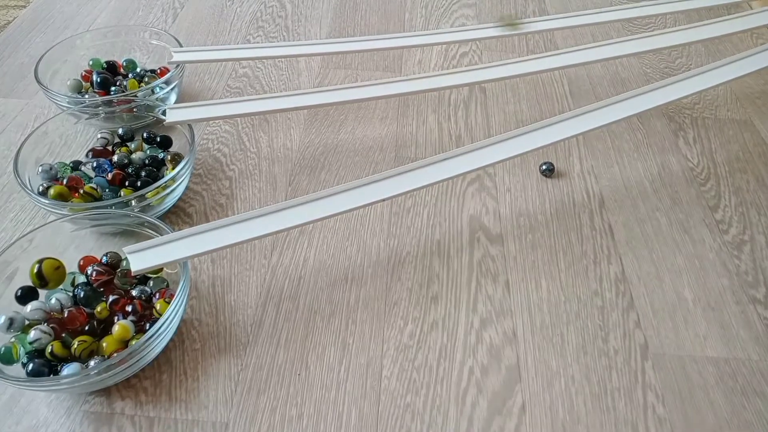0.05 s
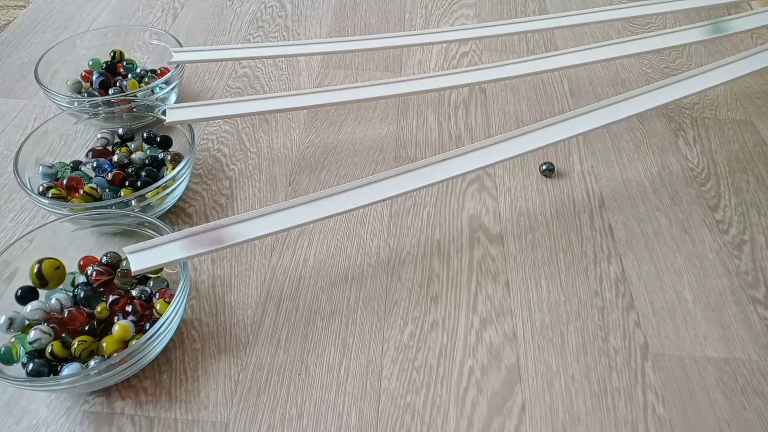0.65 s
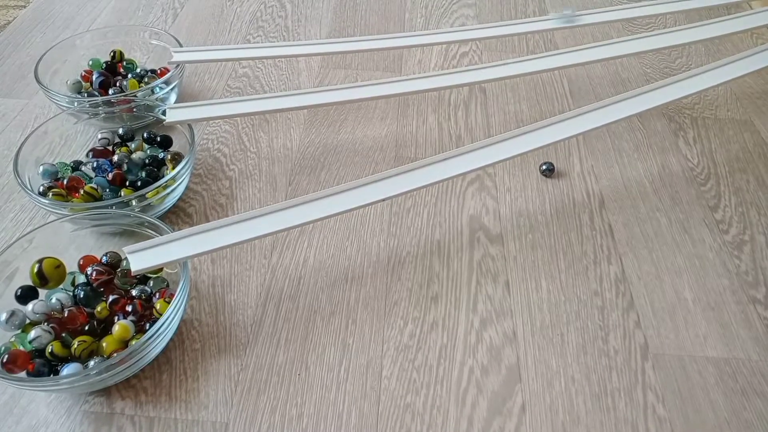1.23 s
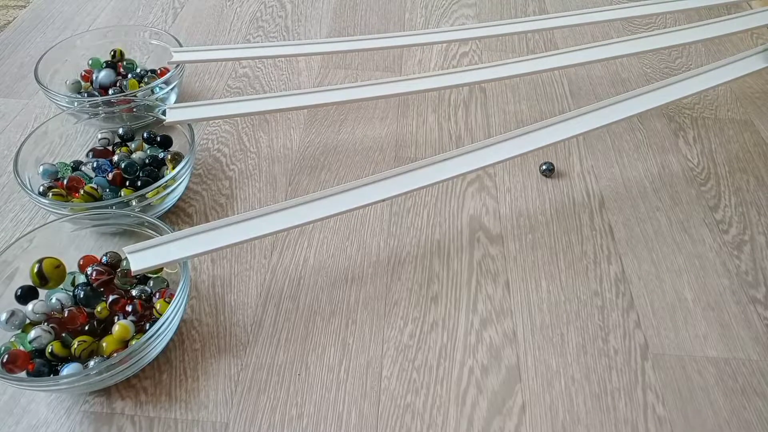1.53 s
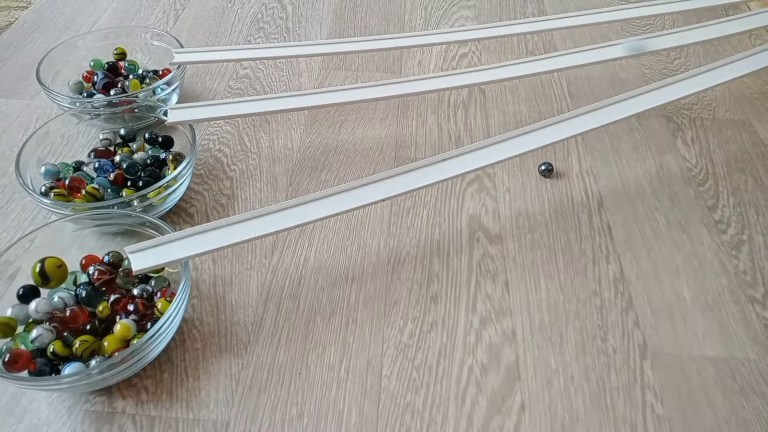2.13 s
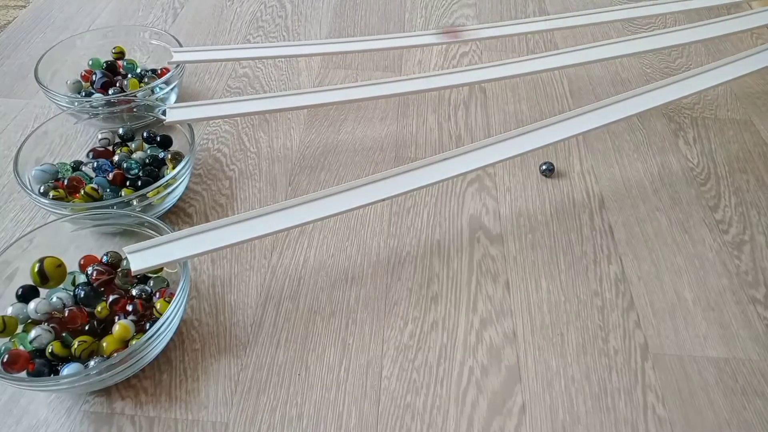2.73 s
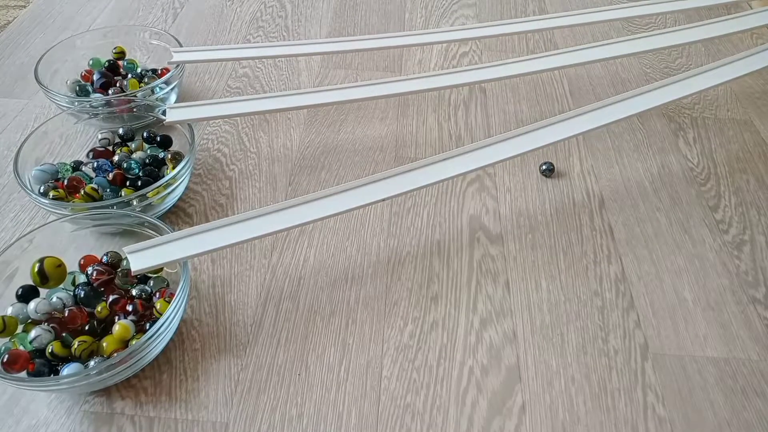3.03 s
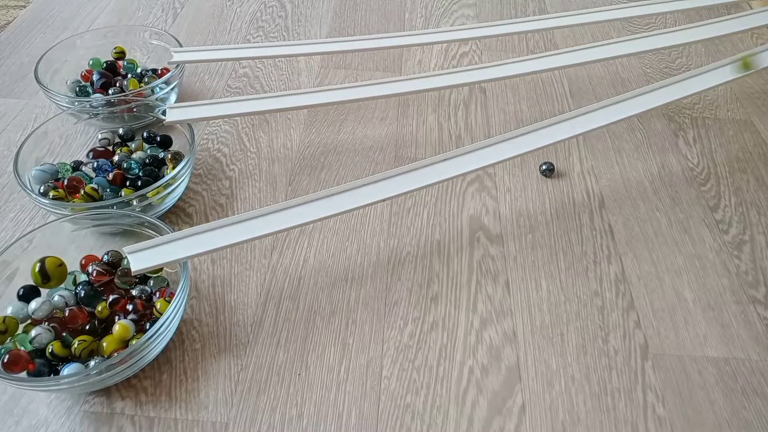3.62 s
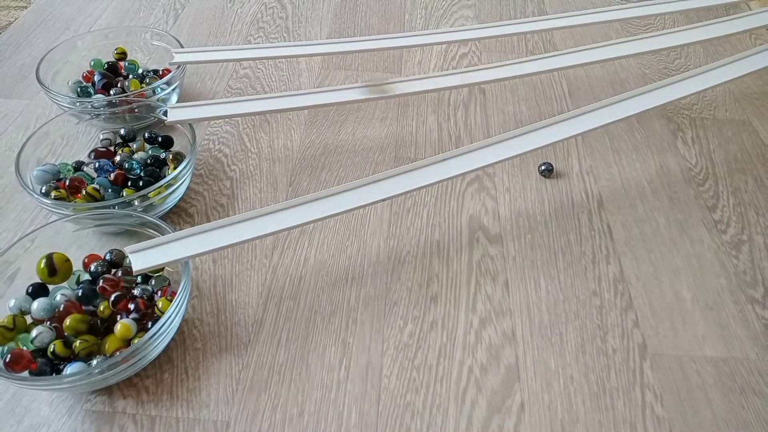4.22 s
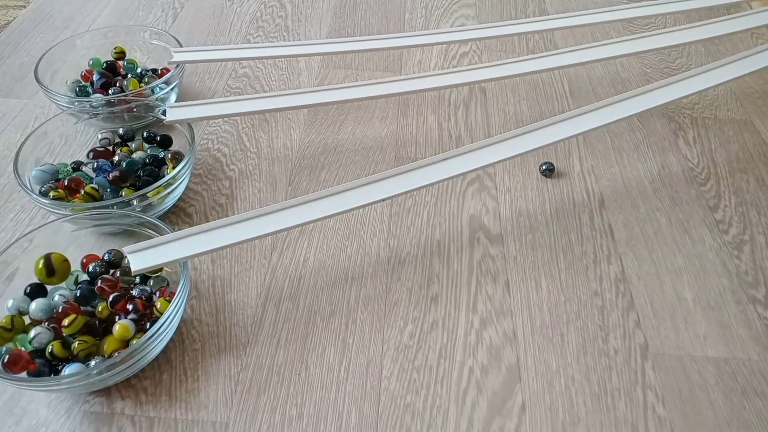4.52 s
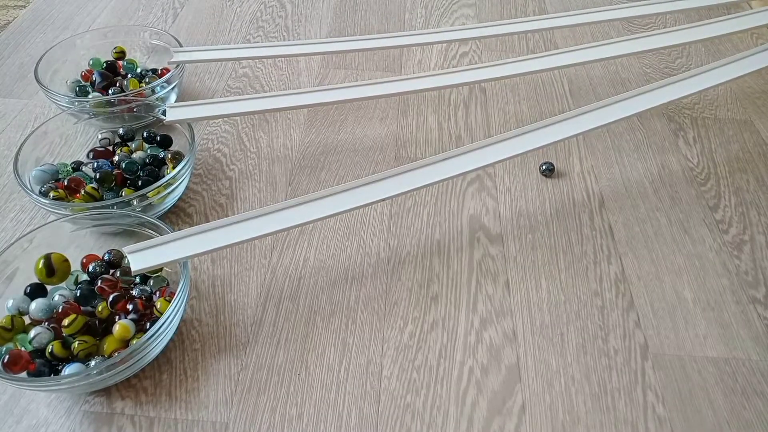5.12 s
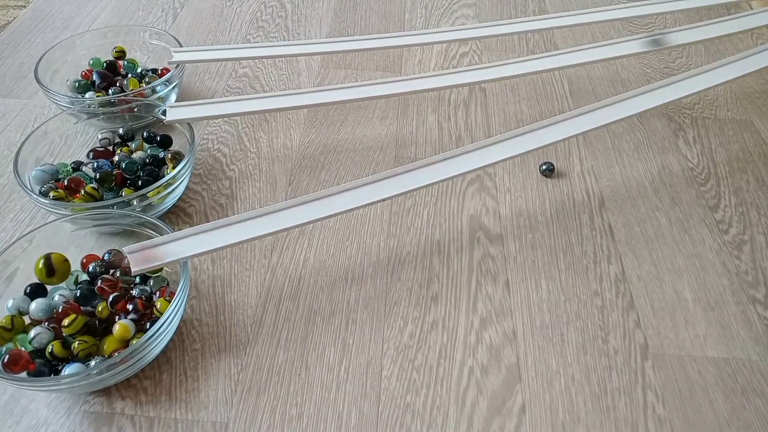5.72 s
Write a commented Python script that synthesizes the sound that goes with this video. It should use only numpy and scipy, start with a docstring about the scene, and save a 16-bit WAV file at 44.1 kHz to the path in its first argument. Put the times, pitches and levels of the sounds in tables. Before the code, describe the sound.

Glass marbles roll down plastic channels and drop one after another into glass bowls of marbles, with sharp clinks and brief ringing.

```python
"""Marbles dropping into glass bowls.

Glass marbles rumble and whine down three plastic channels into bowls already heaped with marbles.
Each impact is a brief click that spreads through the heap as a rattle and excites the damped modes
of the bowl wall. The bowls thud on a wooden floor in a small, hard room; one microphone is close."""
import sys
import numpy as np
from scipy import signal
from scipy.fft import rfft, irfft, next_fast_len
from scipy.io import wavfile
from scipy.ndimage import map_coordinates

SR = 44100
rng = np.random.default_rng(int(sys.argv[2]) if len(sys.argv) > 2 else 0)


def transcribe(u):
    """Save the signal u as a 16-bit wav file named by the first command-line argument.

    u: samples, shape (n,) or (channels, n), limited to [-1, 1]; the rate is SR.
    q: integer samples, one column per channel.
    """
    v = np.clip(np.atleast_2d(u).T, -1, 1)
    q = np.round(v * 32767).astype(np.int16)
    wavfile.write(sys.argv[1], SR, q)


N = 262836
LENGTH = 16384  # samples in one impact
TIME, AGE = np.arange(N) / SR, np.arange(LENGTH) / SR
HZ = np.fft.rfftfreq(LENGTH, 1 / SR)

# reverberation of the room: (frequency [Hz], t60 [s])
ROOM_T60 = [(100, .25), (500, .36), (1400, .31), (3700, .235), (9700, .235), (15000, .23)]
# spectrum of the room noise: (frequency [Hz], level [dB])
AMBIENT_SPECTRUM = [(15, -58.5), (25, -18.5), (92, -7.5), (145, -2.5), (503, -14.5), (1020, -27.5),
                    (1160, -29), (4370, -22.5), (4870, -24.5), (5430, -24), (16000, -51.5)]
# spectrum of glass rolling on plastic: (frequency [Hz], level [dB])
ROLLING_SPECTRUM = [(40, -21), (120, -9), (450, -4), (700, -3), (1150, -2), (2600, -1), (3900, -5),
                    (4600, -18), (5500, -14), (7000, -18), (8200, -16), (9400, -10), (11000, -20),
                    (16000, -40)]
# response of the floorboard: (frequency [Hz], level [dB])
FLOOR_SPECTRUM = [(25, -19.5), (70, -1), (135, 5.5), (200, -2.5), (350, -15), (900, -32.5), (3000, -82.5)]
# spectrum of one glass contact: (frequency [Hz], level [dB])
CLICK_SPECTRUM = [(60, -27), (200, -19.5), (420, -3.5), (740, -10), (950, -8), (1500, -9), (2300, 4.5),
                  (3300, 1), (5300, -10), (6900, -9), (7900, -7.5), (9300, -2.5), (11500, -12.5),
                  (15500, -14)]
# spectrum of collisions within the heap: (frequency [Hz], level [dB])
HEAP_SPECTRUM = [(60, -22), (200, -21.5), (420, -14.5), (740, -8), (950, -7.5), (1100, 1), (1600, -4.5),
                 (2300, 5), (3300, 4), (5400, -7.5), (6900, -1.5), (7900, -8), (9500, -2), (11500, -20),
                 (15500, -12.5)]
# resonances of a plastic channel: (frequency [Hz], bandwidth [Hz], level [dB])
CHANNEL_MODES = [(410, 240, -25.5), (905, 28, -13.5), (1210, 47, -8), (2130, 203, -3), (2890, 2340, -19),
                 (4070, 160, -16)]
# wall modes damped by the heap, in the order lowest, main, upper ones:
# (frequency [Hz], level among the upper modes [dB], t60 [s])
BOWL_MODES = [(2238, 0, .1), (3966, 0, .13), (6064, -1, .1), (8505, 0, .105), (11240, -6, .08)]
# the bowl's highest modes: (frequency [Hz], bandwidth [Hz], level [dB])
SHIMMER_MODES = [(10170, 50, -9), (11900, 60, -2), (12060, 55, 0), (12862, 35, -1), (12998, 35, -1),
                 (13600, 35, -6), (13820, 50, -3), (14295, 45, -2), (14830, 55, -2), (15205, 45, 1)]
# each channel with its bowl, by name: (main mode [Hz], thud hardness [dB/octave], two whines),
# each whine at landing being (frequency [Hz], level over the rumble [dB])
LANES = {"near": (3998, 0.33, [(5020, -7), (10000, -17)]), "middle": (3972, 11.7, [(5650, -18),
         (9600, -17.5)]), "far": (3954, 9.5, [(5650, -21.5), (9700, -15.5)])}
# dull knocks on the channels: (time [s], level [dB], tilt [dB/octave])
KNOCKS = [(1.885, -30, -1.5), (3.729, -29.5, 4.5), (4.7361, -27.5, 0.5), (5.519, -42.5, -15)]
# light taps on the near channel: (time [s], level [dB])
PINGS = [(3.347, -36.5), (3.4026, -43.5), (5.099, -38), (5.1126, -23)]
# a marble lands on the heap:
# (time [s], lane, rolling [dB], click [dB], rattle [dB], shimmer [dB], ring [dB], thud [dB])
LANDINGS = [(.0078, "far", -32.5, -10, -31, -30, -36.5, -51.5),
            (.419, "far", -56.5, -22, -23, -28.5, -45, -50), (.822, "near", -54, -15.5, -26, -27, -39, -46),
            (1.183, "middle", -56.5, -12.5, -40, -29.5, -30, -42),
            (1.6362, "far", -57.5, -6.5, -26.5, -29.5, -53, -56),
            (2.0908, "near", -51.5, -12.5, -25, -26, -31, -41.5),
            (2.6017, "middle", -53.5, -10, -35, -45, -43, -71),
            (3.0769, "far", -53.5, -9, -29, -30.5, -49.5, -52),
            (4.1567, "near", -53.5, -10, -31.5, -28, -28.5, -47.5),
            (4.529, "middle", -50.5, -8.5, -30, -27.5, -32.5, -36),
            (5.127, "far", -55, -17, -24, -30, -41.5, -66),
            (5.2707, "far", -56.5, -10.5, -22.5, -33, -35, -70),
            (5.8899, "near", -49.5, -9.5, -40, -31, -38, -60)]
# a marble rebounds against the wall; lean is added to the main mode and taken from the lowest:
# (time [s], ring [dB], lean [dB], click [dB], rattle [dB], thud [dB])
REBOUNDS = [(.026, -27.5, 7, -28, -42, -66), (0.098, -40.5, -1.5, -45, -50, -69),
            (0.1367, -36, 3.5, -21, -52, -75), (0.2006, -39.5, 4, -20, -64.5, -71.5),
            (0.4881, -24, 0, -23, -20.5, -44), (0.8728, -25.5, 2.5, -11, -41, -47.5),
            (.982, -38, 4, -18.5, -46, -72), (1.6797, -26.5, 2.5, -10, -37, -35.5),
            (2.14, -29, 3.5, -13.5, -32, -55), (2.228, -37, 2.5, -13.5, -30, -71),
            (2.63, -27, 8, -10.5, -36, -48), (2.683, -32.5, 3, -37, -58, -75),
            (2.753, -37, 3, -24, -42, -72), (3.146, -30, 4, -14.5, -24.5, -51),
            (4.19, -32.5, 0.5, -12, -25.5, -55), (5.1812, -24.5, 4.5, -14.5, -45, -44.5),
            (5.2977, -28, 1, -38, -31, -51), (5.322, -35, 11.5, -19, -28, -72),
            (5.389, -33.5, 3, -20, -28.5, -68), (5.9128, -27, 2.5, -20, -49, -45.5)]
# lighter clicks in the settling heap or on a channel joint:
# (time [s], click [dB], tilt [dB/octave], rattle [dB])
SETTLES = [(0.082, -24, -7, -30), (0.1299, -18.5, -2, -43), (.436, -19.5, 7.5, -19),
           (.543, -19, 6.5, -25.5), (0.8393, -11.5, -1.5, -38), (1.01, -31, 0, -59), (1.192, -16, 0, -34),
           (1.2576, -16, -1, -31), (1.3047, -13, -2.5, -34), (1.3534, -28, -2, -35), (1.745, -25, 3, -27),
           (1.8932, -20, 0, -41), (1.9228, -27.5, 1.5, -62), (2.5347, -43, -9, -39),
           (2.6899, -15, 1.5, -47), (3.091, -25, 2.5, -22), (3.297, -41, -5, -65.5),
           (3.3471, -31, 1, -53.5), (3.361, -38.5, -14, -46), (4.3159, -24.5, 3, -58),
           (4.3618, -22, -0.5, -37.5), (4.3798, -27.5, 11, -62), (4.426, -25.5, 1, -46),
           (4.629, -16.5, 1, -29.5), (4.6917, -20, 2.5, -57), (4.8542, -36, -2, -51),
           (4.9152, -33, -3.5, -49), (5.4977, -29.5, 1, -47)]

CREEP_S, RUN_S = 0.45, 0.49  # a marble creeps along the top of its channel, then runs down


def amp(db):
    """Decibels to amplitude ratio."""
    return 10 ** (np.asarray(db) / 20)


def unit(x):
    """Normalise to rms 1."""
    return x / np.sqrt(np.mean(x ** 2) + 1e-20)


def burst(x, span_s):
    """Normalise a transient to the energy of rms 1 held for span_s."""
    return x * np.sqrt(span_s * SR / (np.sum(x ** 2) + 1e-20))


def along(points, hz):
    """Interpolate (frequency [Hz], value) points on a logarithmic axis."""
    f, v = np.transpose(points)
    return np.interp(np.log(hz + 1), np.log(f + 1), v)


def add(track, s, x):
    """Superpose x on the track at s seconds."""
    start = max(0, round(s * SR))
    part = track[start:start + len(x)]
    part += x[:len(part)]


def decay(t60):
    """Exponential damping: 60 dB in t60 seconds."""
    return amp(-60 * AGE / t60)


def struck(x, db):
    """Minimum-phase filtering: the causal response to x, given the gain at each frequency."""
    cepstrum = irfft(np.log(np.maximum(amp(db), 1e-6)))
    cepstrum[1:LENGTH // 2] *= 2
    cepstrum[LENGTH // 2 + 1:] = 0
    return irfft(rfft(x) * np.exp(rfft(cepstrum)))


def noise(spectrum):
    """Stationary noise of rms 1, shaped by (frequency [Hz], level [dB]) points."""
    size = next_fast_len(N + LENGTH)
    gain = amp(along(spectrum, np.fft.rfftfreq(size, 1 / SR)))
    return unit(irfft(rfft(rng.standard_normal(size)) * gain, size)[:N])


def wobble(rate_hz):
    """Smooth random modulation through rate_hz knots a second."""
    return map_coordinates(rng.standard_normal(int(N * rate_hz / SR) + 4), [TIME * rate_hz])


def slope(tilt):
    """Spectral tilt as a gain in dB: a harder contact carries more treble."""
    return tilt * np.log2(np.clip(HZ, 1500, 12000) / 4000)


def ripple(depth_db, spacing_hz):
    """Local resonance: each spot in the heap has its own spectral peaks and dips, in dB."""
    return depth_db * map_coordinates(rng.standard_normal(512), [HZ / spacing_hz], mode="wrap")


def resonances(modes):
    """Modal summation: the response of second-order resonators of alternating sign."""
    return sum((-1) ** k * amp(db) * 1j * HZ * width / (hz * hz - HZ ** 2 + 1j * HZ * width)
               for k, (hz, width, db) in enumerate(modes))


def mode(hz, t60):
    """A damped oscillation that flutters in strength and phase, as under shifting marbles."""
    knots = .55 * (rng.standard_normal(64) + 1j * rng.standard_normal(64))
    flutter = np.interp(AGE, np.linspace(0, AGE[-1], len(knots)), knots)
    wave = np.real((1 + flutter) * np.exp(2j * np.pi * (hz * AGE + rng.random())))
    return wave * decay(t60) * (1 - np.exp(-AGE / 0.00067))


def collisions(per_s, lowest, t60):
    """A Poisson train of impulses, drawn between lowest and 1 and dying away."""
    return (rng.random(LENGTH) < per_s / SR) * rng.uniform(lowest, 1, LENGTH) * decay(t60)


def room_tail(build_s=0.00093):
    """Diffuse reverberation: decaying noise, different for each source position."""
    hz, t, bands = signal.stft(rng.standard_normal(LENGTH), SR, nperseg=256)
    absorption = amp(-60 * t / along(ROOM_T60, hz)[:, None])
    tail = signal.istft(bands * absorption, SR, nperseg=256)[1][:LENGTH]
    tail *= 1 - np.exp(-AGE / build_s)
    return tail / np.linalg.norm(tail)


def in_room(x, tail, wet_db):
    """Direct sound plus its convolution with the room's tail."""
    return x + amp(wet_db) * irfft(rfft(x) * rfft(tail))


def background():
    """Ambient noise: a faint steady floor, with a low drone that swells once."""
    swell = np.interp(TIME, [2.6, 2.85, 3.35, 3.65], [0, 1, 1, 0])
    drone = amp(-67.0) * swell * np.sin(2 * np.pi * 86 * TIME + 0.47 * wobble(9))
    return amp(-71.5) * noise(AMBIENT_SPECTRUM) + drone


def rolling(creep_db=-9, pickup_s=0.018, rise_db_per_s=10.5, octaves_per_s=0.22, sink_db_per_s=12):
    """Roughness excitation: as a marble gains speed its rumble grows and its rising whines sink in."""
    power, whines, near_power = np.zeros((3, N))
    # uneven contact smears each whine into a narrow band of noise
    grain = noise([(10, 0), (250, 0), (550, -9), (1500, -30), (4000, -70)])
    hollow = noise([(100, -30), (280, -3), (480, 0), (750, -6), (1500, -20), (4000, -60)])
    for s, lane, db, *_ in LANDINGS:
        span = (TIME > s - RUN_S - CREEP_S) & (TIME < s)
        to_go = s - TIME[span]
        creep = amp(creep_db) * np.sqrt(np.clip((RUN_S + CREEP_S - to_go) / CREEP_S, 0, 1))
        run = .5 + .5 * np.tanh((RUN_S - to_go) / pickup_s)
        level = amp(db - rise_db_per_s * to_go) * np.maximum(creep, run)
        for whine_hz, whine_db in LANES[lane][2]:
            phase = 2 * np.pi * np.cumsum(whine_hz * 2 ** (-octaves_per_s * to_go)) / SR
            whines[span] += amp(whine_db + sink_db_per_s * to_go) * level * np.sin(phase)
        power[span] += level ** 2
        near_power[span] += level ** 2 * (lane == "near")
    uneven_db = .8 * wobble(14) + 1.1 * wobble(110)
    rumble = amp(uneven_db) * np.sqrt(power) * noise(ROLLING_SPECTRUM)
    hum = amp(-16.5 + 2.5 * wobble(25)) * np.sqrt(near_power) * hollow
    return rumble + whines * grain + hum


def channel_knocks(flight_s=0.0093, loss_db=7):
    """Inelastic bouncing: three ever weaker blows excite the plastic's modes; a light tap only pings."""
    track = np.zeros(N)
    body_db = 20 * np.log10(abs(resonances(CHANNEL_MODES)) + 1e-5)
    for s, db, tilt in KNOCKS:
        for hop in range(3):
            bump = rng.standard_normal(LENGTH) * decay(0.19)
            knock = amp(db - hop * loss_db) * burst(struck(bump, body_db + slope(tilt)), 0.012)
            add(track, s + hop * flight_s, in_room(knock, room_tail(), wet_db=-17))
    for s, db in PINGS:
        ping = amp(db) * burst(mode(hz=4900, t60=0.017), 0.0011)
        add(track, s, in_room(ping, room_tail(), wet_db=-9))
    return track


def floor_thuds(knock_transfer_db=-27.5, knock_hardness=16):
    """Structure-borne sound: blows on bowl or channel give the floorboard one short push each."""
    track = np.zeros(N)
    pushes = [(s, db, lane_at(s)[1]) for s, *_, db in LANDINGS + REBOUNDS]
    pushes += [(s, db + knock_transfer_db, knock_hardness) for s, db, _ in KNOCKS]
    for s, db, hardness in pushes:
        board_db = along(FLOOR_SPECTRUM, HZ) + hardness * np.log2(np.clip(HZ, 100, 800) / 100)
        thud = amp(db) * burst(struck(np.exp(-AGE / 0.00024), board_db), 0.017)
        add(track, s, in_room(thud, room_tail(), wet_db=-19.5))
    return track


def lane_at(s):
    """The lane of the marble that landed last."""
    return LANES[[lane for start, lane, *_ in LANDINGS if start <= s][-1]]


def bowl_rings(landing_lean_db=-0.5):
    """Modal vibration: the spot and hardness of a blow set the balance of the wall's modes."""
    track = np.zeros(N)
    mode_hz = np.array(BOWL_MODES)[:, 0]
    hits = [(s, ring, landing_lean_db) for s, *_, ring, _ in LANDINGS] + [row[:3] for row in REBOUNDS]
    for s, db, lean in hits:
        low_db, main_db = db - lean - .8, db + lean - .4
        # the bowls differ most in their low modes
        tuning = 1 + (lane_at(s)[0] / mode_hz[1] - 1) * np.sqrt(mode_hz[1] / mode_hz)
        tail = room_tail()
        low, main, *partials = [amp(level) * unit(in_room(mode(hz * ratio, t60), tail, wet_db=-2))
                                for (hz, level, t60), ratio in zip(BOWL_MODES, tuning)]
        upper = sum(amp(rng.normal(0, 2)) * partial for partial in partials)
        ring = amp(low_db) * burst(low, 0.094) + amp(main_db) * burst(main, 0.06)
        ring += amp(db) * burst(upper, 0.11)
        # the whole rim flexes, a low note that the heap nearly chokes
        flex = amp(low_db - 13) * burst(in_room(mode(hz=935.6, t60=0.073), tail, wet_db=-5), 0.036)
        # the shaking wall makes the marbles that touch it chatter
        taps = struck(collisions(per_s=1800, lowest=-0.78, t60=0.27), along(HEAP_SPECTRUM, HZ))
        chatter = amp(db - 7.5) * burst(in_room(taps, tail, wet_db=-3), 0.023)
        add(track, s, ring + flex + chatter)
    return track


def contacts(landing_tilt=-1.2, rebound_tilt=2, tick_tilt=1.5):
    """Every glass impact: (time [s], click [dB], tilt [dB/octave], rattle [dB], shimmer [dB])."""
    # landings share one tilt, as all marbles fall from one height
    rows = [(s, click, landing_tilt, heap, shimmer) for s, _, _, click, heap, shimmer, _, _ in LANDINGS]
    rows += [(s, click, rebound_tilt, heap, ring - 6.5) for s, ring, _, click, heap, _ in REBOUNDS]
    rows += [(s, click, tilt, heap, heap + 8 + 0.97 * click) for s, click, tilt, heap in SETTLES]
    # a tick on a flaw of the channel once a run, and one with each ping; neither reaches a bowl
    ticks = [(s - RUN_S * rng.random(), rng.normal(-43.5, 1.5)) for s, *_ in LANDINGS]
    ticks += [(s, db + 3.5) for s, db in PINGS]
    return rows + [(s, db, tick_tilt, db - 18.5, -np.inf) for s, db in ticks if s > 0]


def marble_clacks():
    """Elastic impact: glass meets glass in a millisecond click; the heap rattles, the bowl shimmers."""
    track = np.zeros(N)
    contact_db, heap_db = along(CLICK_SPECTRUM, HZ), along(HEAP_SPECTRUM, HZ)
    wall = resonances(SHIMMER_MODES)
    for s, db, tilt, rattle_db, shimmer_db in contacts():
        contact = rng.standard_normal(LENGTH) * decay(0.0019)
        click_colour = contact_db + slope(tilt) + ripple(depth_db=2.5, spacing_hz=631)
        click = amp(db) * burst(struck(contact, click_colour), 0.00069)
        # the shock spreads through the heap as many tiny collisions
        jostles = collisions(per_s=1300, lowest=-1.12, t60=0.24)
        rattle_colour = heap_db + slope(.5 * tilt) + ripple(depth_db=2.5, spacing_hz=222.3)
        rattle = amp(rattle_db) * burst(struck(jostles, rattle_colour), 0.0098)
        # the first of them drive the wall's highest modes
        shimmer = amp(shimmer_db) * burst(irfft(rfft(jostles * decay(0.069)) * wall), 0.024)
        add(track, s, in_room(click + rattle + shimmer, room_tail(), wet_db=-4))
    return track


def scene():
    """Superposition: the pressures of all sources add at one microphone."""
    return (marble_clacks() + bowl_rings() + floor_thuds() + channel_knocks() + rolling() + background())[None]


def record(dry):
    """Band limiting: a steep low-pass removes the highest treble."""
    top_hz, edge_hz = 15650, 250
    size = next_fast_len(N + LENGTH)
    passband = np.clip((top_hz - np.fft.rfftfreq(size, 1 / SR)) / edge_hz, 0, 1)
    return irfft(rfft(dry, size) * passband, size)[:, :N]


dry = scene()
out = record(dry)
transcribe(out)
```